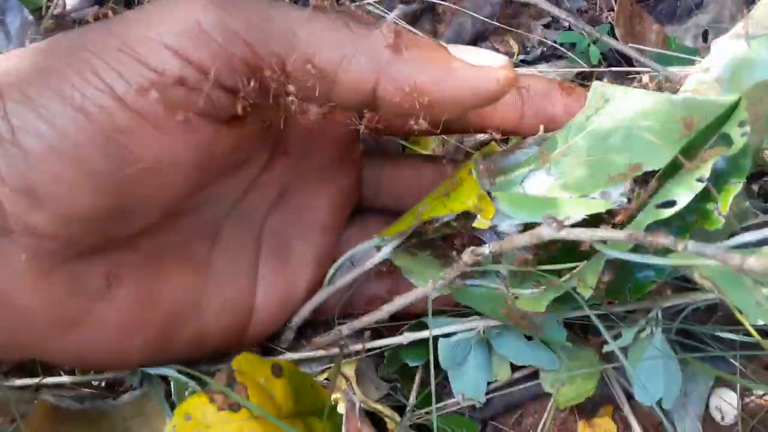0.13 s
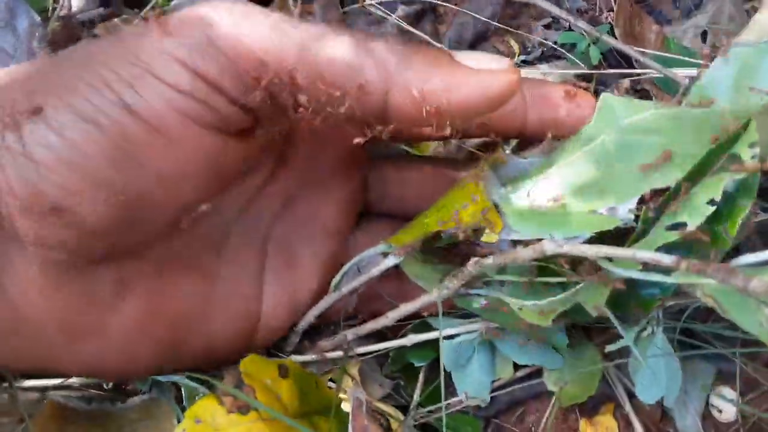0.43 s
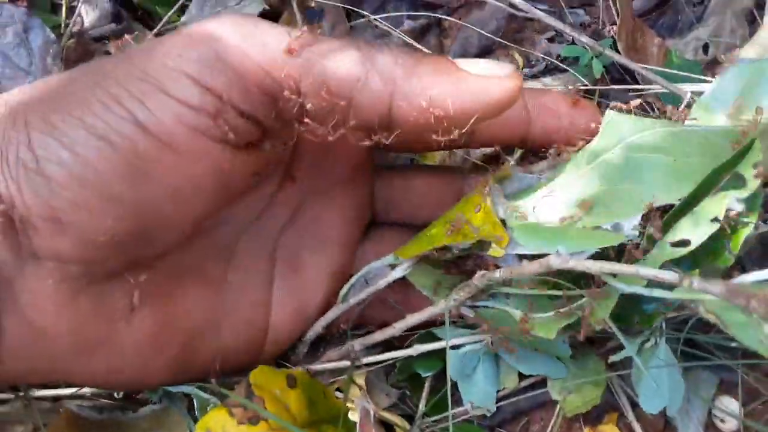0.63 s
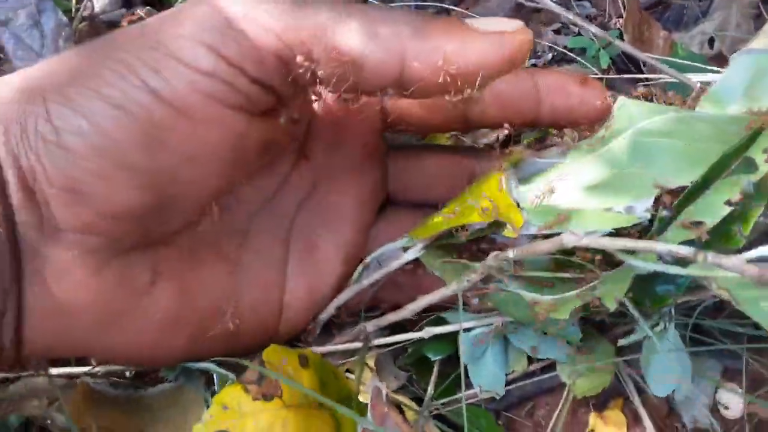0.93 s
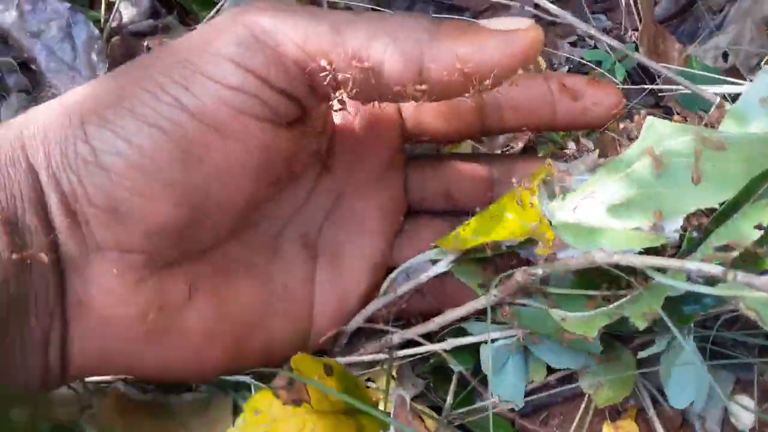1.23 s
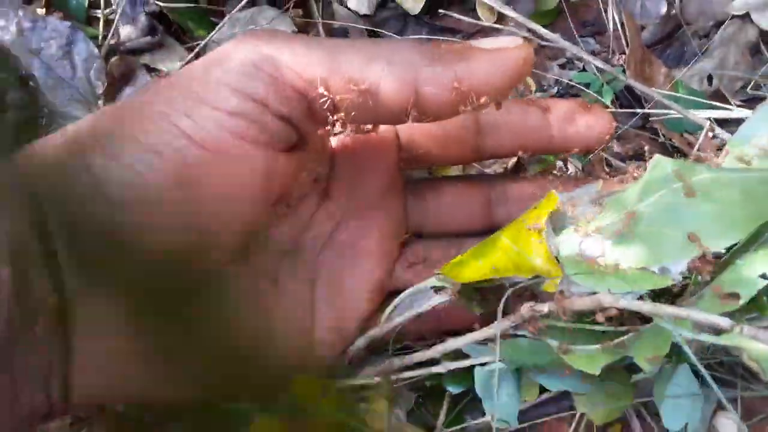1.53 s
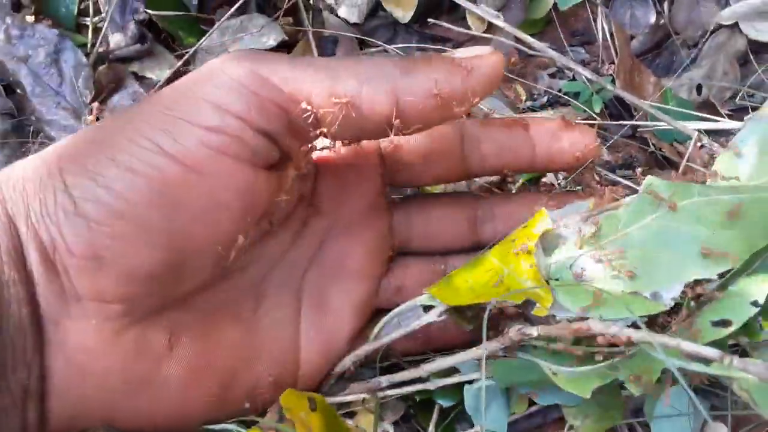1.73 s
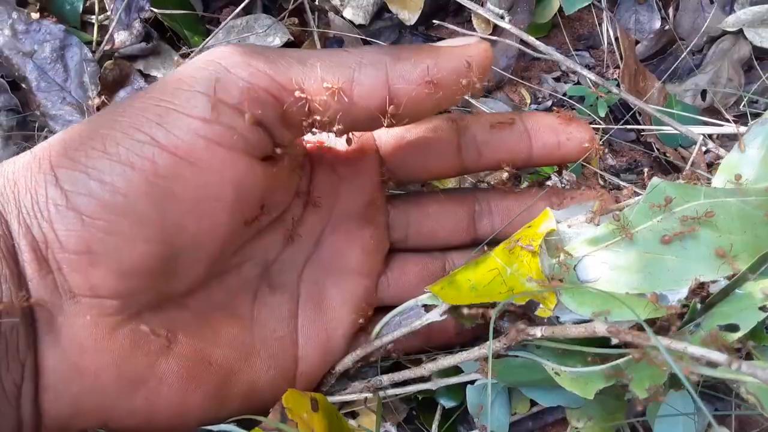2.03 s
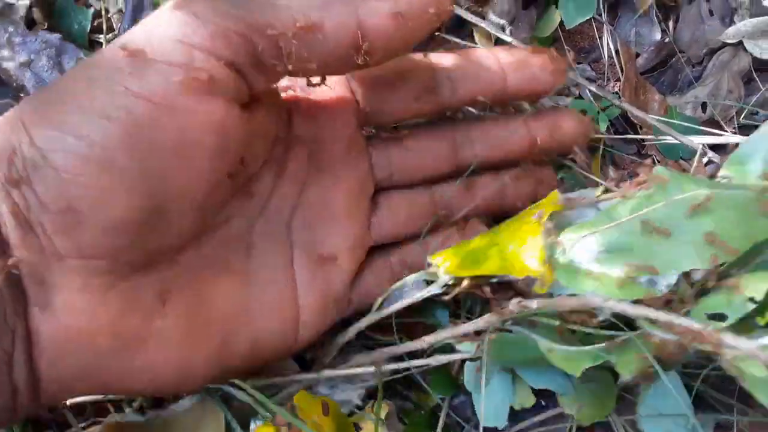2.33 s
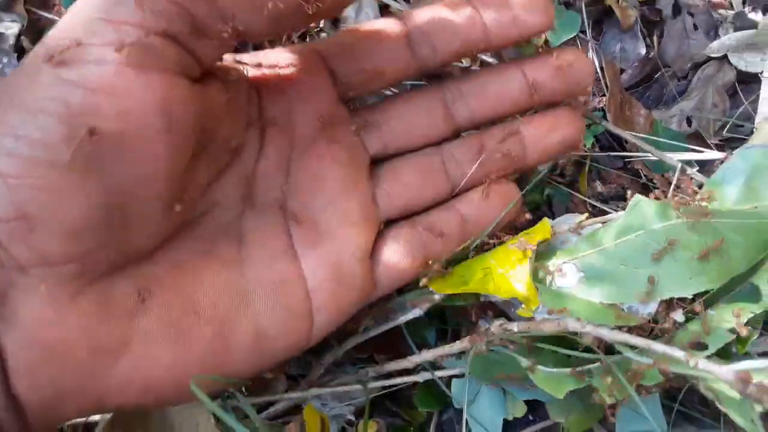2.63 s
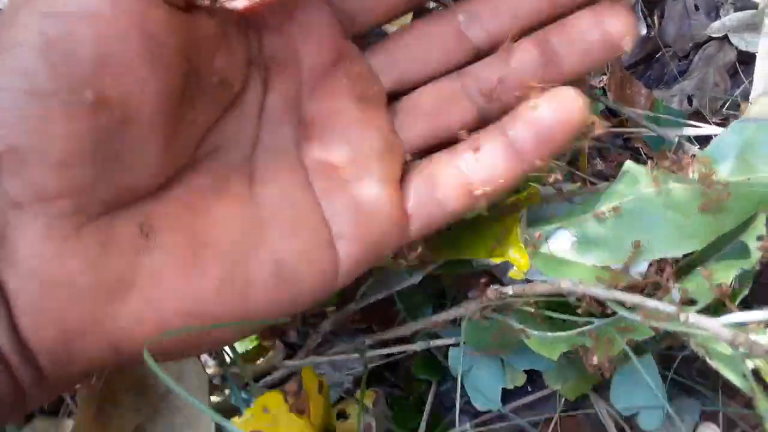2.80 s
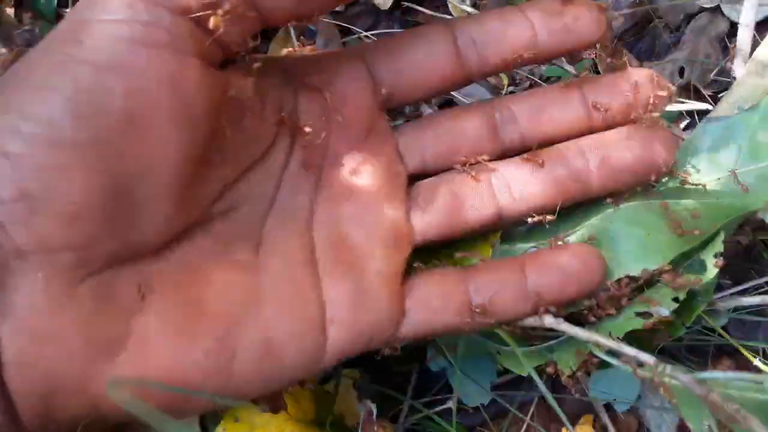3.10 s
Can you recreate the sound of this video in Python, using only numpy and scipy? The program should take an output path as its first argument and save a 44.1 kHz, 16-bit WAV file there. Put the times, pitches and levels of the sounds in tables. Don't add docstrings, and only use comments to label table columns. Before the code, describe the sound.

Crisp leaf rustling with sharp twig snaps, faint distant birds and low wind thumps later

```python
import sys
import numpy as np
from scipy import signal
from scipy.fft import rfft, irfft
from scipy.io import wavfile
from scipy.ndimage import uniform_filter1d

SR = 44100
rng = np.random.default_rng(int(sys.argv[2]) if len(sys.argv) > 2 else 0)


def amplitude_ratio(level_db):
    exponent = np.asarray(level_db, float) / 20
    return 10 ** exponent


def master(y):
    cut = np.clip(np.atleast_2d(y).T, -1, 1)
    pcm = np.round(cut * 32767)
    wavfile.write(sys.argv[1], SR, pcm.astype(np.int16))


N = 143766
TOP_HZ, LOUD_SNAP_TOP_HZ = 15850, 16750

# (frequency [Hz], density [dB per Hz])
AIR_COLOUR = [(350, -12), (900, -6), (2300, -3), (3000, -15), (5200, -11), (8700, -36), (11000, -16),
              (15200, -2)]
# (frequency [Hz], density [dB per Hz])
RUMBLE_COLOUR = [(15, -43), (25, 3.5), (64, -12.5), (92, 0.5), (114, -10), (139, -6.5), (162, -12),
                 (203, -12), (500, -32), (650, -32.5), (1100, -120)]
# (frequency [Hz], density [dB per Hz])
LEAF_COLOUR = [(350, 5), (950, 7.5), (2100, -2), (5000, 0.5), (8600, -26), (10300, -13), (14700, 2),
               (16800, -11.5)]
# (start [s], length [s], level [dB], crisp top [dB re level], dull body [dB re level])
HAND_STROKES = [(0, 0.5, -69, 4, 4.5), (0.03, 0.1, -61.5, 2, 2.5), (0.381, 0.064, -57, -6, 1.5),
                (0.404, 0.34, -67, 2, -1), (1.018, 0.19, -60, 3, -4), (1.152, 0.47, -57.5, -0.5, -17),
                (1.303, 0.47, -61.5, 4, -1.5), (1.458, 0.14, -55.5, -4, -7), (1.617, 0.26, -59.5, 5, 1),
                (1.822, 1, -75, 16.5, 10.5), (2.094, 0.45, -57.5, 4, -1.5), (2.293, 0.14, -54.5, 5.5, -4),
                (2.397, 0.14, -54, 6.5, 0), (2.479, 0.33, -68.5, 2, 11.5), (2.715, 0.33, -63, 4.5, 5),
                (3.022, 0.17, -46.5, 1, -4.5), (3.11, 0.16, -58, -0.5, 2), (1.337, 0.064, -56.5, -2, -3),
                (0.426, 0.055, -58, -6, 3.5), (2.19, 0.17, -59.5, 6, 1)]
# (time [s], crisp top [dB], middle [dB re top], low [dB re top])
TWIG_SNAPS = [(0.041, -40, -14, 3), (0.0797, -38, -21, 2), (0.186, -33, -20, -38), (0.3202, -46.5, -1, -8),
              (0.4265, -28.5, -24, -37), (0.5902, -45.5, 3, -17), (1.0718, -37, -18, -20),
              (1.145, -37, -6, -25), (1.1754, -44, 4, -13), (1.2323, -38, -10, -29), (1.304, -47, 4, -18),
              (1.3885, -48.5, 8, -9), (1.4287, -47, 7, -19), (1.5133, -31, -2, 3.5),
              (1.5369, -39.5, 0, 8.5), (1.5443, -26, -28, -26), (1.608, -40, -6, -22),
              (1.636, -26.5, -10, -2.5), (1.6808, -35, -1, 7), (1.7472, -31, -14, 0),
              (2.0235, -30.5, -16, -8), (2.157, -29, -24, -20), (2.2044, -47, -15, -22.5),
              (2.3497, -46, -11, -19), (2.3638, -37, 4, -26), (2.523, -33.5, -29, -17),
              (2.8699, -35, -28, -16), (3.03, -35, -11, -5), (3.055, -30.5, -2, -28),
              (3.1257, -37, -5.5, 12.5), (2.259, -38.5, -22, -22), (2.283, -38, -16, -18),
              (2.334, -46, -20, -22), (3.081, -35, -12, -15), (0.178, -39, -20, -20)]
# (time [s], level [dB], pitch [Hz])
LEAF_TICKS = [(0.0417, -53, 4240), (0.041, -41.5, 1920), (0.0644, -56, 6800), (0.0803, -54, 5510),
              (0.0803, -59, 4390), (0.1857, -48.5, 5140), (0.3198, -60.4, 6300), (0.4156, -48, 3530),
              (0.4275, -44, 5000), (0.429, -46, 2660), (1.0738, -48.5, 5130), (1.1454, -51.7, 4500),
              (1.1589, -51, 6100), (1.1683, -54, 5430), (1.1728, -53, 4480), (1.176, -52.6, 5770),
              (1.1766, -46.5, 1400), (1.3015, -50, 5000), (1.3075, -54.5, 6840), (1.317, -42, 2520),
              (1.3739, -51, 5700), (1.378, -50, 5680), (1.3898, -56, 5000), (1.4285, -47, 4100),
              (1.433, -51, 6290), (1.4353, -48, 1380), (1.4906, -46, 2300), (1.5146, -53, 4770),
              (1.5166, -41, 2390), (1.522, -45, 5000), (1.537, -52.1, 6070), (1.5373, -47, 1380),
              (1.545, -56, 2500), (1.6363, -57, 6550), (1.6366, -42.9, 5000), (1.638, -37, 3080),
              (1.6817, -47.0, 6120), (1.6816, -41.5, 4800), (1.7405, -49, 5400), (1.7485, -50.6, 2580),
              (1.8638, -58.5, 6300), (2.0249, -49.5, 2440), (2.1561, -49.5, 5080), (2.2602, -47, 1460),
              (2.35, -45, 6000), (2.3513, -46, 3470), (2.3648, -41.5, 4460), (2.4865, -51, 4450),
              (2.7056, -53.4, 4820), (3.0546, -42, 3650), (3.0586, -41, 3620), (3.077, -42, 2760),
              (3.0795, -42.4, 4600), (3.1269, -39, 3680), (3.1279, -47, 1540), (3.1309, -45, 3530)]
# (start [s], length [s], first pitch [Hz], last pitch [Hz], level [dB])
BIRD_SLIDES = [(.596, .022, 2600, 2620, -63), (.785, .03, 2550, 2750, -65), (.862, .032, 2380, 2280, -64),
               (.888, .018, 2600, 2620, -65), (1.312, .018, 2900, 2000, -62),
               (1.563, .008, 4200, 6900, -53), (1.572, .015, 7000, 4800, -53),
               (1.65, .016, 3700, 5600, -53), (1.89, .028, 3300, 3350, -61), (1.284, .016, 3050, 2700, -58),
               (1.885, .03, 3000, 2650, -59), (1.908, .012, 3400, 2800, -60), (1.59, .016, 3100, 3600, -57),
               (.929, .012, 2550, 3300, -59), (1.184, .014, 2300, 2000, -61),
               (1.166, .012, 5600, 3400, -59), (1.54, .012, 1900, 2700, -56)]
# (start [s], length [s], top pitch [Hz], level [dB], loudest place [0-1])
BIRD_WHISTLES = [
    (.926, .06, 3400, -53, .72),
    (1.246, .056, 3450, -54, .38),
    (1.55, .048, 3420, -51, .5),
    (1.848, .06, 3420, -54, .45),
]
# (centre [s], half length before shortening [s], peak [dB], pitch [Hz])
WIND_PUFFS = [(1.827, 0.014, -32.5, 78), (2.088, 0.049, -35, 81), (2.216, 0.046, -39.5, 91.5),
              (2.259, 0.033, -35, 85), (2.286, 0.015, -31.5, 122), (2.38, 0.041, -38.5, 142),
              (2.39, 0.051, -32.5, 65), (2.503, 0.012, -36, 190), (2.516, 0.093, -31, 115),
              (2.595, 0.079, -32.5, 69), (2.62, 0.052, -38.5, 94.7), (2.676, 0.052, -33.5, 73),
              (2.712, 0.026, -33, 85), (2.769, 0.031, -35.5, 80), (2.876, 0.042, -36, 74.6),
              (2.952, 0.039, -44, 67), (3.157, 0.029, -28, 70), (3.186, 0.032, -26.5, 91.5),
              (3.221, 0.071, -42.5, 61.7), (3.255, 0.031, -31, 95)]
# (frequency [Hz], side minus middle [dB])
SIDE_COLOUR = [(60, -58), (110, -72), (200, -19), (380, -14.5), (700, -11.5), (1290, -16.5), (2380, -17.5),
               (4400, -16.5), (8120, -7.5), (15000, -9)]


def evened(x):
    return x / np.sqrt(np.mean(x ** 2) + 1e-20)


def read(points, hz):
    f, value = np.transpose(points)
    return np.interp(np.log(hz + 1), np.log(f + 1), value)


def add(mix, s, sound):
    start = max(round(s * SR), 0)
    part = mix[start:start + len(sound)]
    part += sound[:len(part)]


def coloured(x, points, lo=0, hi=30000):
    hz = np.fft.rfftfreq(len(x), 1 / SR) + 1e-3
    edges = 1 / np.sqrt((1 + (lo / hz) ** 8) * (1 + (hz / hi) ** 8))
    return irfft(rfft(x) * amplitude_ratio(read(points, hz)) * edges, len(x))


def walled(x, top_hz):
    return irfft(rfft(x) * (np.fft.rfftfreq(len(x), 1 / SR) < top_hz), len(x))


def wander(per_s):
    width = int(SR / per_s)
    smooth = uniform_filter1d(rng.standard_normal(N), width)
    return evened(uniform_filter1d(smooth, width))


def patchy(x, depth_db):
    z = signal.stft(x, nperseg=512, noverlap=384)[2]
    field = uniform_filter1d(rng.standard_normal(z.shape), size=5, axis=0)
    field = uniform_filter1d(field, size=24, axis=1)
    return signal.istft(z * amplitude_ratio(depth_db * evened(field)), nperseg=512, noverlap=384)[1][:N]


def background():
    hiss = patchy(coloured(rng.standard_normal(N), AIR_COLOUR, lo=300), depth_db=2.5)
    air = evened(hiss) * amplitude_ratio(-57 + 0.67 * wander(11))
    rumble = evened(coloured(rng.standard_normal(N), RUMBLE_COLOUR, hi=650))
    return air + rumble * amplitude_ratio(-46.5 + 0.72 * wander(9.9))


def rustle():
    grains_per_s, grain_spread_db, grain_cycles, smear_db, flicker_db = 1800, 4.5, 2.7, 4, 2.5
    t = np.arange(N) / SR
    power = np.zeros((3, N))
    for s, length, db, crisp_db, dull_db in HAND_STROKES:
        u = np.clip((t - s) / length, 0, 1)
        levels = amplitude_ratio(db + np.array([[dull_db], [0], [crisp_db]]))
        power += (levels * np.sin(np.pi * u) ** 1.01) ** 2

    size = amplitude_ratio(grain_spread_db * np.minimum(rng.exponential(1, N), 2.6))
    size *= rng.random(N) < grains_per_s / SR
    leaf = rng.integers(0, 24, N)
    grains = np.zeros(N)
    for k, hz in enumerate(np.geomspace(450, 15500, num=24)):
        cycles = np.arange(600) / SR * hz
        ring = np.sin(2 * np.pi * cycles) * np.exp(-cycles / grain_cycles) * hz / 4000
        grains += signal.oaconvolve(size * (leaf == k), ring)[:N]

    rubbing = amplitude_ratio(smear_db) * rng.standard_normal(N)
    source = patchy(evened(grains) + rubbing, depth_db=0.87)
    bands = [(300, 1700), (1700, 8500), (8500, 30000)]
    parts = np.array([coloured(source, LEAF_COLOUR, lo, hi) for lo, hi in bands])
    flicker = amplitude_ratio(flicker_db * np.array([0.44 * wander(73), 0.85 * wander(49), 1.3 * wander(75)]))
    return (parts * flicker * np.sqrt(power)).sum(0) / parts[:2].sum(0).std()


def snaps():
    decay_s, trim_db, mid_trim_db, low_trim_db, tail_db = 0.0024, -5.5, -1, -9, -9
    t = np.arange(1800) / SR
    crack = np.exp(-t / decay_s)
    shape = crack + 0.077 * np.roll(crack, 90) + amplitude_ratio(tail_db) * np.exp(-t / 0.004)
    fade = np.minimum(t / .002, 1) ** 2 * np.exp(-(t / .009) ** 2)
    out = np.zeros(N)
    for s, top_db, mid_db, low_db in TWIG_SNAPS:
        burst = np.roll(shape * rng.standard_normal(len(t)), 100)
        top_hz = LOUD_SNAP_TOP_HZ if top_db > -31 else TOP_HZ
        parts = [(11500, 33000, 0.0052),  # (low edge [Hz], high edge [Hz], level [dB])
                 (2500, 21000, mid_db + mid_trim_db),
                 (680, 1800, low_db + low_trim_db)]
        for lo, hi, db in parts:
            band = fade * walled(coloured(burst, LEAF_COLOUR, lo, hi), top_hz)
            add(out, s - 70 / SR, band / abs(band).max() * amplitude_ratio(top_db + db + trim_db))
    return out


def ticks():
    decay_s, pair_ratio = 0.002, 1.09
    t = np.arange(500) / SR
    envelope = np.minimum(t / 0.00014, 1) * np.exp(-t / decay_s)
    out = np.zeros(N)
    for (s, db, hz), phase in zip(LEAF_TICKS, rng.random(len(LEAF_TICKS))):
        ring = np.sin(2 * np.pi * hz * t)
        ring += 0.54 * np.sin(2 * np.pi * (hz * pair_ratio * t + phase))
        add(out, s, amplitude_ratio(db) * envelope * ring)
    return out


def birds():
    arch_start, arch_end, arch_peak = .76, .78, .36
    trees_t60_s, trees_db, flutter_db = .55, -4.5, 4
    out = np.zeros(N)
    for s, length, from_hz, to_hz, db in BIRD_SLIDES:
        u = np.arange(0, 1, 1 / (length * SR))
        hz = from_hz + (to_hz - from_hz) * u
        add(out, s, amplitude_ratio(db) * np.sin(np.pi * u) ** 0.11 * np.sin(2 * np.pi * np.cumsum(hz) / SR))
    for s, length, top_hz, db, loudest in BIRD_WHISTLES:
        u = np.arange(0, 1, 1 / (length * SR))
        rise = np.clip(1 - u / arch_peak, 0, 1)
        fall = np.clip((u - arch_peak) / (1 - arch_peak), 0, 1)
        hz = top_hz * (1 - (1 - arch_start) * rise ** 2 - (1 - arch_end) * fall ** 1.5)
        effort = np.sin(np.pi * u) ** .4 * (.25 + .65 * np.exp(-((u - loudest) / .2) ** 2))
        add(out, s, amplitude_ratio(db) * effort * np.sin(2 * np.pi * np.cumsum(hz) / SR))
    out *= amplitude_ratio(flutter_db * np.clip(wander(120), -2, 1))

    t = np.arange(SR // 2) / SR
    echoes = rng.standard_normal(len(t)) * (rng.random(len(t)) < .05)
    tail = echoes * amplitude_ratio(-60 * t / trees_t60_s) * (t > .006)
    return out + amplitude_ratio(trees_db) * signal.fftconvolve(out, tail / np.linalg.norm(tail))[:N]


def wind():
    roar_db, sharpness, span = -10, .2, .7
    out = np.zeros(N)
    wobble = .15 * wander(54)
    roar = amplitude_ratio(roar_db) * evened(coloured(rng.standard_normal(N), RUMBLE_COLOUR, 31, 580))
    for s, full_length, db, hz in WIND_PUFFS:
        length = span * full_length
        at = np.arange(round((s - length) * SR), min(round((s + length) * SR), N))
        turn = 2 * np.pi * np.cumsum(hz * (1 + wobble[at])) / SR
        turn -= np.interp(s * SR, at, turn)
        swell = np.cos(np.pi / 2 * (at / SR - s) / length) ** 2
        swings = np.cos(turn) + sharpness * swell * np.cos(2 * turn)
        out[at] -= amplitude_ratio(db) * swell * (swings + roar[at])
    return out


def scene():
    mid = walled(background() + rustle(), TOP_HZ) + snaps() + ticks() + birds() + wind()
    scattered = coloured(mid, SIDE_COLOUR) * wander(56)
    side = amplitude_ratio(-5.5) * coloured(scattered, [(1, 0), (20000, 0)], lo=310)
    return np.array([mid + side, mid - side])


def band_limit(x):
    return signal.sosfilt(signal.butter(12, 16810, fs=SR, output="sos"), x)


def record(dry):
    hz = np.fft.rfftfreq(N, 1 / SR) + 1e-3
    finished = irfft(rfft(dry) / np.sqrt(1 + (40 / hz) ** 18), N)
    return band_limit(finished)


dry = scene()
out = record(dry)
master(out)
```